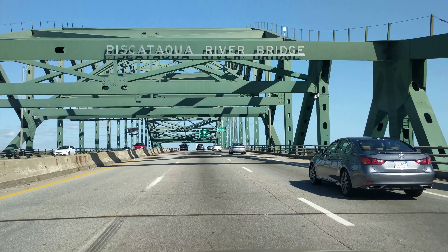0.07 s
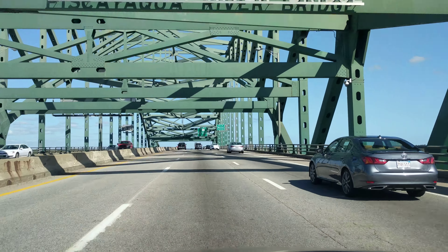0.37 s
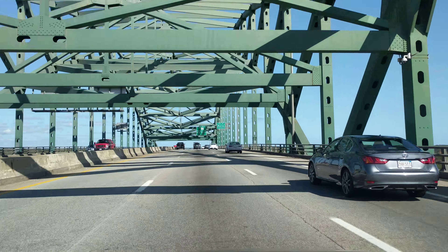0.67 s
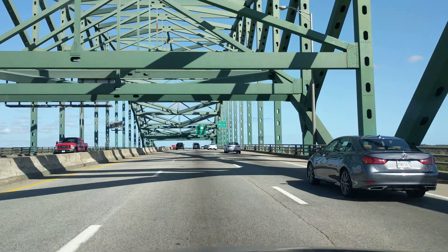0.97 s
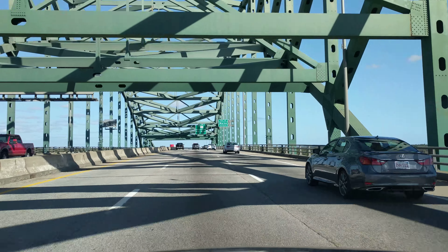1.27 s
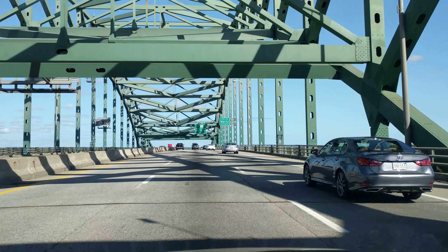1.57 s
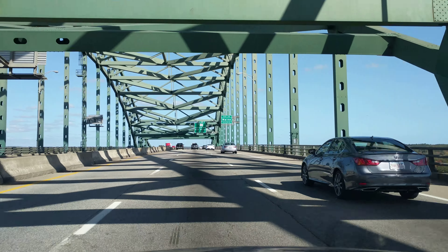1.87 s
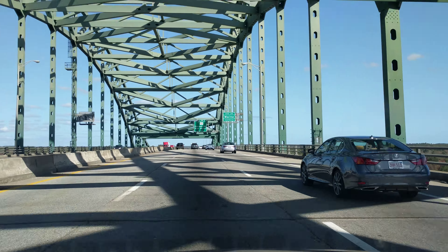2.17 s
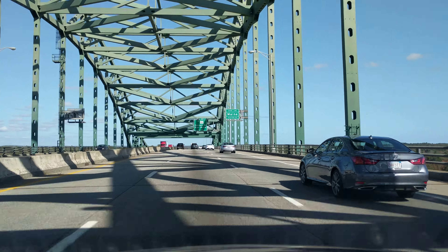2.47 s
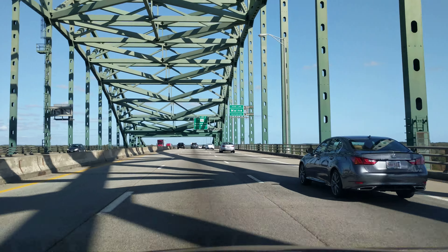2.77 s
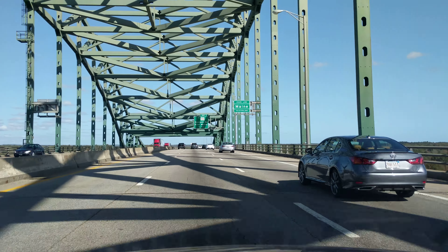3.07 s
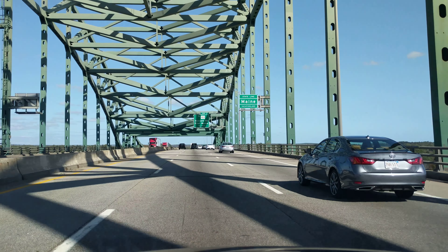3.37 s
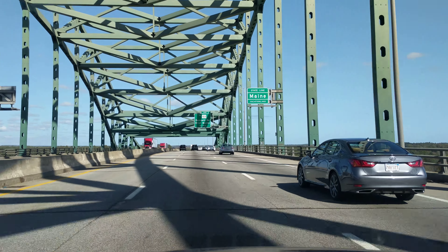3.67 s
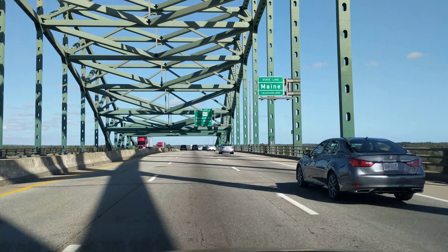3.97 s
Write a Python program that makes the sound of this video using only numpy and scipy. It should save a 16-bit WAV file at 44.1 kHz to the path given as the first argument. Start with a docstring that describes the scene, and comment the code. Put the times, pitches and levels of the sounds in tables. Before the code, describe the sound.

Low road noise fills the cabin of a fast-moving car on a steel bridge. Front and rear tyres thump over a deck joint, then after a smooth stretch over four more, evenly spaced, briefly rattling loose interior trim.

```python
"""Car crossing a steel bridge

Inside, at motorway speed: steady tyre roar, cabin rumble and a faint high whine.
At each deck joint the front, then the rear tyres slap and set the car body booming,
and loose plastic trim rattles. Gain control ducks the road noise after every thump."""
import sys
import numpy as np
from scipy import signal
from scipy.fft import rfft, irfft
from scipy.io import wavfile
from scipy.ndimage import uniform_filter1d, minimum_filter1d

SR = 44100
rng = np.random.default_rng(int(sys.argv[2]) if len(sys.argv) > 2 else 0)


def unload_wav(signal):
    """Save mono or channel-first audio to the path in sys.argv[1] as 16-bit WAV at rate SR, clipped to [-1, 1]."""
    wavfile.write(
        sys.argv[1],
        SR,
        np.round(np.clip(np.atleast_2d(signal).T, -1, 1) * 32767).astype(np.int16),
    )


N = 176400
TIME = np.arange(N) / SR
HZ = np.fft.rfftfreq(N, 1 / SR)


def amp(db):
    """Decibels to gain."""
    return 10 ** (np.asarray(db) / 20)


def colour(points, peaks=()):
    """Gain per frequency: smooth outline plus resonances."""
    freq_hz, level_db = np.transpose(points)
    outline_db = np.interp(np.log(HZ + 1), np.log(freq_hz), level_db)
    peaks_db = sum(lift / (1 + (2 * (HZ - hz) / width) ** 2) for hz, width, lift in peaks)
    return amp(outline_db + peaks_db)


def noise(gain):
    """Coloured noise, rms 1."""
    x = irfft(rfft(rng.standard_normal(N)) * gain, N)
    return x / np.sqrt(np.mean(x ** 2) + 1e-20)


def drift(rate_hz):
    """Random wander below rate_hz, rms 1."""
    return noise(1 / (1 + (HZ / rate_hz) ** 4))


def swell(start_s, rise_s, order=1):
    """Envelope: peaks at 1 after rise_s, then dies away."""
    age = np.maximum(TIME - start_s, 0) / rise_s
    return (age * np.exp(1 - age)) ** order


# freq_hz, density_db (relative)
ROAD_SPECTRUM = [(12, -47), (22, -27), (32, -9.5), (42, -6.5), (55, 6.5), (65, 8), (85, 4), (110, 4),
                 (150, -4), (250, -10.5), (360, -18), (600, -25.5), (1000, -31.5), (1500, -36), (2000, -42),
                 (2600, -50.5), (3500, -54.5), (5000, -62), (7000, -71), (9000, -75.5), (12000, -79),
                 (16000, -81.5)]
# Tread and cabin resonances: centre_hz, width_hz, lift_db
ROAD_RESONANCES = [(56.7, 18, 3), (244.2, 15, 4), (458.3, 26, 8.5), (794, 13, 3.5), (815.7, 26, 10.5),
                   (1034, 40, 3.5), (1480, 48, 5.5), (2200, 58, -1.5)]
# time_s, rumble_db, roar_db
ROAD_SURFACE = [(0, 2.5, 4), (0.202, -3.5, 2), (.42, -4, 7), (0.599, 8.5, 1.5), (.8, -5, 1.5),
                (0.999, 1, 4.5), (1.5, -3, 4), (1.949, -1.5, 5.5), (2.302, 1.5, 3), (2.9, 2.5, 3),
                (3.452, 2, 5), (4, 3.5, 4.5)]

def road(gain_db=-23.5, crossover_hz=195, lump_db=-1.74, flutter_db=0.88):
    """Cabin rumble below, tyre roar above; both follow the surface."""
    spectrum = rfft(noise(colour(ROAD_SPECTRUM, ROAD_RESONANCES)))
    low_pass = 1 / (1 + (HZ / crossover_hz) ** 4)
    time_s, rumble_db, roar_db = np.transpose(ROAD_SURFACE)
    rumble = irfft(spectrum * low_pass, N)
    rumble *= amp(np.interp(TIME, time_s, rumble_db) + lump_db * drift(rate_hz=7))
    roar = irfft(spectrum * (1 - low_pass), N)
    roar *= amp(np.interp(TIME, time_s, roar_db) + flutter_db * drift(rate_hz=25))
    return amp(gain_db) * (rumble + roar)


def whine(pitch_hz=11643, level_db=-95):
    """Faint, steady high tone."""
    return amp(level_db) * np.sin(2 * np.pi * pitch_hz * TIME)


# Tyre, suspension and cabin modes per axle: pitch_hz, level_db, rise_s
FRONT_BOOM_MODES = [(50.6, -21, .066), (88.6, -10, .0363), (128, -24, .02)]
REAR_BOOM_MODES = [(48.6, -15.6, .0759), (72.7, -15.2, .053), (93.9, -13.2, .0541), (99.7, -5.9, .0368),
                   (163.5, -24, .032), (186, -27, .036)]

def boom(start_s, modes):
    """Blow to one axle: low modes build through the suspension and ring out."""
    return sum(amp(db) * swell(start_s, rise_s, order=2) * np.sin(2 * np.pi * hz * (TIME - start_s))
               for hz, db, rise_s in modes)


# start_s, gain_db
DECK_BUMPS = [(.008, -6.5)]

def bumps():
    """Uneven deck stirs the front suspension."""
    return sum(amp(db) * boom(start_s, FRONT_BOOM_MODES) for start_s, db in DECK_BUMPS)


# pitch_hz, level_db
TREAD_RING_MODES = [(590, -43), (700, -42), (790, -33.5), (870, -40.5), (1040, -49), (1250, -52)]

def tread(start_s, rise_s, detune=0.024):
    """Front tread rings briefly on the joint's edge."""
    ring = np.zeros(N)
    for pitch_hz, level_db in TREAD_RING_MODES:
        pitch_hz *= 1 + detune * rng.standard_normal()
        ring += amp(level_db) * np.sin(2 * np.pi * pitch_hz * (TIME - start_s))
    return ring * swell(start_s, rise_s, order=2)


# freq_hz, density_db (relative)
SLAP_SPECTRUM = [(100, -26), (400, -1.5), (600, -2.5), (800, -3), (1100, -8), (1600, -26.5), (3000, -37),
                 (8000, -65), (16000, -82.5)]
KNOCK_SPECTRUM = [(40, -28.5), (110, -7.5), (180, 3.5), (270, 1.5), (350, -6), (460, -11.5), (650, -23.5),
                  (1500, -31), (3000, -43), (6000, -66), (16000, -86)]
# start_s, front_boom_db, rear_boom_db, slap_db, slap_rise_s, front_knock_db, rear_knock_db
DECK_JOINTS = [(0.4595, -1.5, 0, -0.5, 0.0093, -1.5, -3.5), (2.0217, 3.5, 1, 0.5, 0.011, 1.5, -2.5),
               (2.5421, 4, 2, -2, 0.0091, 4.5, 4.5), (3.062, -1.5, 1.5, -10, 0.011, 0, -1),
               (3.574, -1.5, 2, -1, 0.01, 2, -2.5)]

def joints(axle_lag_s=0.0952, slap_lead_s=0.0078, slap_gain_db=-38, knock_gain_db=-26):
    """Front, then rear tyres hit each joint: the tread slaps, the body knocks and booms."""
    tones, slap_env, knock_env = np.zeros((3, N))
    for front_s, front_db, rear_db, slap_db, slap_rise_s, front_knock_db, rear_knock_db in DECK_JOINTS:
        edge_s = front_s - slap_lead_s
        rear_s = front_s + axle_lag_s
        tones += amp(front_db) * boom(front_s, FRONT_BOOM_MODES)
        tones += amp(rear_db) * boom(rear_s, REAR_BOOM_MODES)
        tones += amp(slap_db) * tread(edge_s, slap_rise_s)
        slap_env += amp(slap_db) * swell(edge_s, slap_rise_s, order=2)
        slap_env += amp(slap_db - 9) * swell(rear_s, rise_s=0.006, order=2)
        knock_env += amp(front_knock_db) * swell(front_s, rise_s=0.029)
        knock_env += amp(rear_knock_db + 0.5) * swell(rear_s, rise_s=0.027)
    slaps = amp(slap_gain_db) * slap_env * noise(colour(SLAP_SPECTRUM))
    knocks = amp(knock_gain_db) * knock_env * noise(colour(KNOCK_SPECTRUM))
    return tones + slaps + knocks


# delay_s (from the front hit), rise_s, level_db
AXLE_SHIVERS = [(0.027, 0.019, -64.5), (0.129, 0.018, -59.5)]

def shiver():
    """Envelope of the whole trim shaking after each axle."""
    return sum(amp(db) * swell(start_s + delay_s, rise_s)
               for start_s, *_ in DECK_JOINTS for delay_s, rise_s, db in AXLE_SHIVERS)


def crackle(shaken_per_s=260, shaken_db=-2, idle_per_s=2, idle_db=-62.5, decay_s=0.0008, centre_hz=5000):
    """Tiny crisp ticks: many while the trim shivers, a few on smooth road."""
    chance, size = rng.random((2, N))
    shaken = amp(shaken_db) * shiver() * (chance < shaken_per_s / SR)
    idle = amp(idle_db) * (chance > 1 - idle_per_s / SR)
    envelope = signal.lfilter([1], [1, -np.exp(-1 / (decay_s * SR))], size * (shaken + idle))
    return envelope * noise(HZ / (HZ ** 2 + centre_hz ** 2))


# freq_hz, density_db (relative)
TRIM_SPECTRUM = [(500, -22.5), (1700, 0), (2500, 3), (3900, 0), (4700, 2.5), (5800, 4), (7000, -6.5),
                 (9000, -13.5), (12000, -35), (16000, -19.5)]
# centre_hz, width_hz, lift_db
TRIM_RESONANCES = [(2030, 70, 13), (2780, 52, 5), (3350, 96, 9), (4300, 84, 7.6), (5560, 130, 3.3)]
# start_s, level_db, sharpness_db, decay_s
TRIM_STRIKES = [(0.534, -64, -11.5, 0.0053), (.652, -54, -14.5, 0.0067), (1.015, -66, 3, .002),
                (2.066, -54, 11, 0.0049), (2.078, -42, -18, 0.0057), (2.0919, -45.5, -18, 0.0079),
                (2.106, -55, -1, 0.006), (2.564, -55, -7, 0.0032), (2.5845, -47, -5, 0.0083),
                (2.6016, -43.5, -2, 0.0096), (2.615, -48, -6, 0.0029), (2.666, -52, 6.5, 0.0037),
                (2.6757, -51.5, 5.5, 0.018), (2.702, -53, -4, 0.0074), (2.722, -52, 10, 0.0017),
                (2.744, -49.5, -1, .0012), (2.767, -70, 7, 0.0015), (3.099, -62, 2, .003),
                (3.116, -49, -5, .005), (3.129, -45, -15, 0.007), (3.205, -54, 12, 0.0023),
                (3.239, -56, -4, .001), (3.246, -53, -5, 0.0027), (3.618, -58, -3, 0.0044),
                (3.632, -46.5, -9, 0.0055), (3.6457, -43.5, -12, 0.0076), (3.659, -55, -10, 0.0043),
                (3.704, -69.5, -6, .012)]

def trim(rise_s=0.0009, ring_db=3.5, tail_db=-13, tail_s=0.013, edge_db=-7.5, edge_hz=3000, grit_db=3.86):
    """Loose trim chatters: gritty strikes ring the plastic, hard ones with a sharp edge."""
    ring_power, edge_power = np.zeros((2, N))
    for start_s, level_db, sharpness_db, decay_s in TRIM_STRIKES:
        age_s = np.maximum(TIME - start_s, 0)
        onset = amp(level_db) * np.minimum(age_s / rise_s, 1)
        strike = onset * np.exp(-np.minimum(age_s / decay_s, 20))
        tail = onset * amp(tail_db) * np.exp(-np.minimum(age_s / tail_s, 20))
        ring_power += strike ** 2 + tail ** 2
        edge_power += (strike * amp(sharpness_db)) ** 2
    ring_env = np.sqrt(amp(ring_db) ** 2 * ring_power + shiver() ** 2)
    ring = ring_env * noise(colour(TRIM_SPECTRUM, TRIM_RESONANCES))
    edge = amp(edge_db) * np.sqrt(edge_power) * noise(HZ / (HZ ** 2 + edge_hz ** 2))
    return (ring + edge) * amp(grit_db * drift(rate_hz=700))


# pitch_hz, level_db (relative to the strike), decay_s
PANEL_RING_MODES = [(1994, -2.5, .016), (2860, -15, 0.01), (3250, -6.5, 0.0099), (4400, -11.5, .012),
                    (5500, -12, .009), (5850, -12.5, .009)]

def panel(detune=0.008):
    """Loose plastic panel rings on after each trim strike."""
    out = np.zeros(N)
    for start_s, strike_db, _, _ in TRIM_STRIKES:
        span = out[round(start_s * SR):][:SR // 8]
        age_s = np.arange(len(span)) / SR
        for pitch_hz, level_db, decay_s in PANEL_RING_MODES:
            pitch_hz *= 1 + detune * rng.standard_normal()
            envelope = amp(strike_db + level_db) * np.exp(-age_s / decay_s)
            span += envelope * np.sin(2 * np.pi * pitch_hz * age_s)
    return out


def scene():
    """Mono mix inside the cabin."""
    return (road() + whine() + bumps() + joints() + trim() + panel() + crackle())[None]


def record(dry, threshold_db=-18, slope=0.46, attack_s=0.009, hold_s=0.09, recover_db_per_s=30):
    """Gain control ducks fast, holds, recovers slowly; then end fade and low-pass."""
    power_db = 10 * np.log10(abs(uniform_filter1d(dry[0] ** 2, size=880)) + 1e-12)
    cut_db = slope * np.maximum(power_db - threshold_db, 0)
    half_hold = int(hold_s * SR / 2)
    held_db = -minimum_filter1d(-cut_db, 2 * half_hold + 1, origin=half_hold)
    recovery_db = TIME * recover_db_per_s
    released_db = np.maximum.accumulate(held_db + recovery_db) - recovery_db
    pole = np.exp(-1 / (attack_s * SR))
    duck_db = signal.lfilter([1 - pole], [1, -pole], released_db)
    fade = np.minimum((TIME[-1] - TIME) / 0.004, 1)
    low_pass = signal.firwin(511, cutoff=16990, window=("kaiser", 9), fs=SR)
    return signal.oaconvolve(dry * amp(-duck_db) * fade, low_pass[None], "same")


dry = scene()
out = record(dry)
unload_wav(out)
```